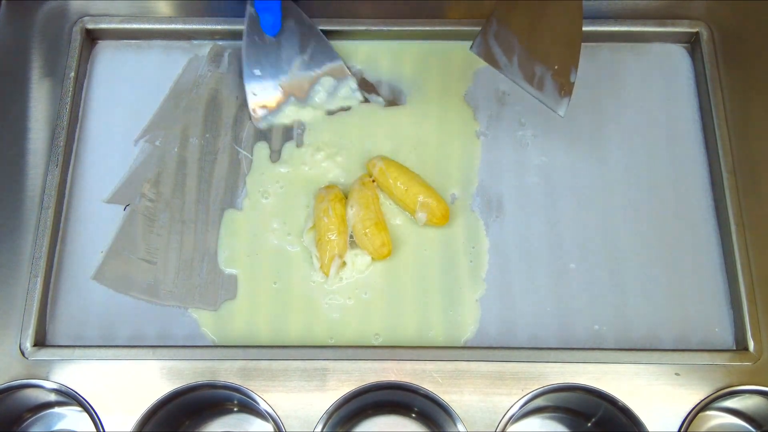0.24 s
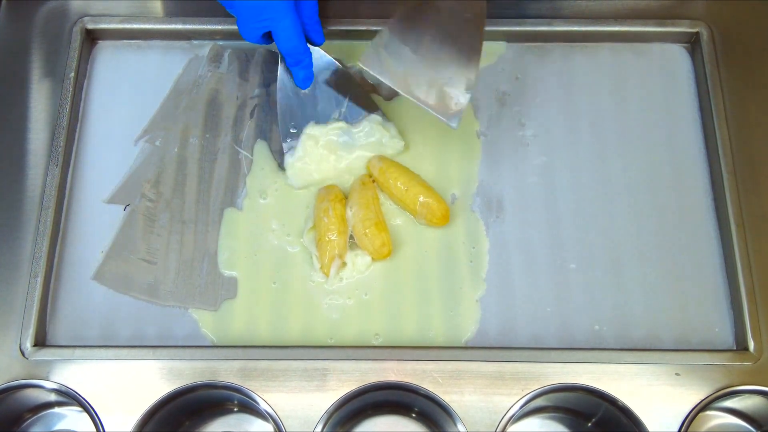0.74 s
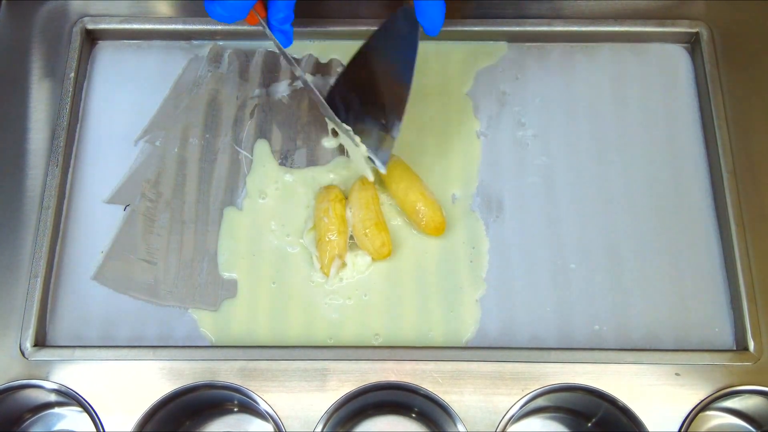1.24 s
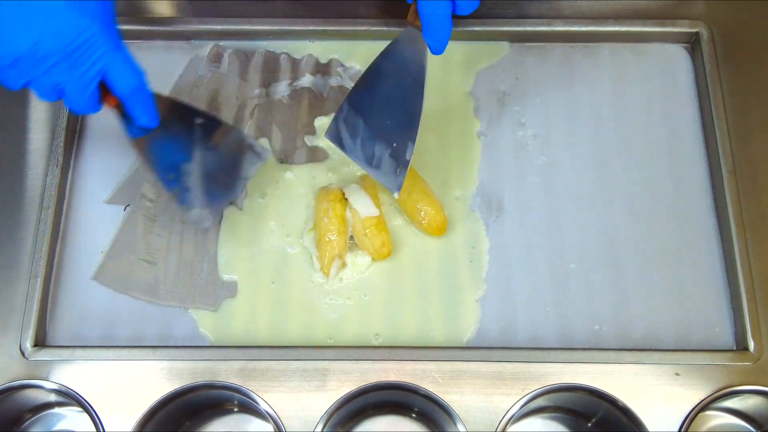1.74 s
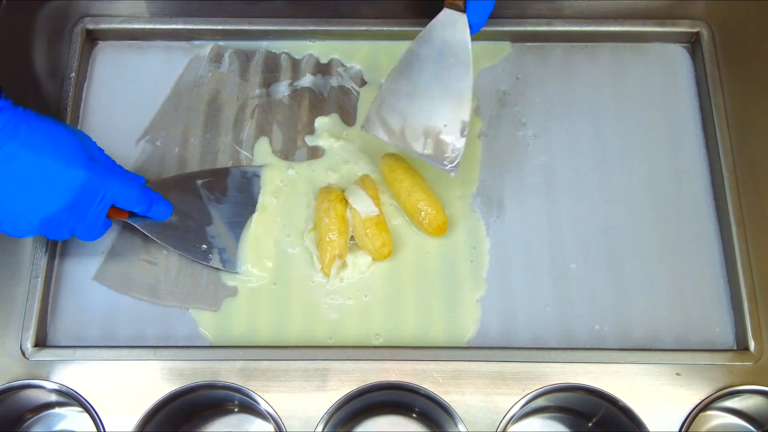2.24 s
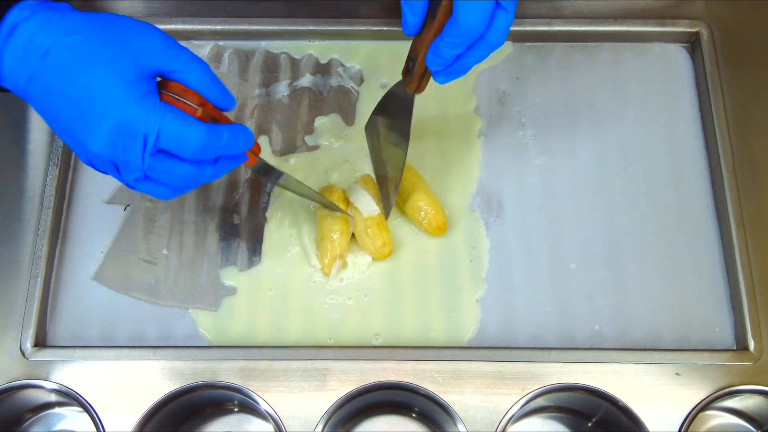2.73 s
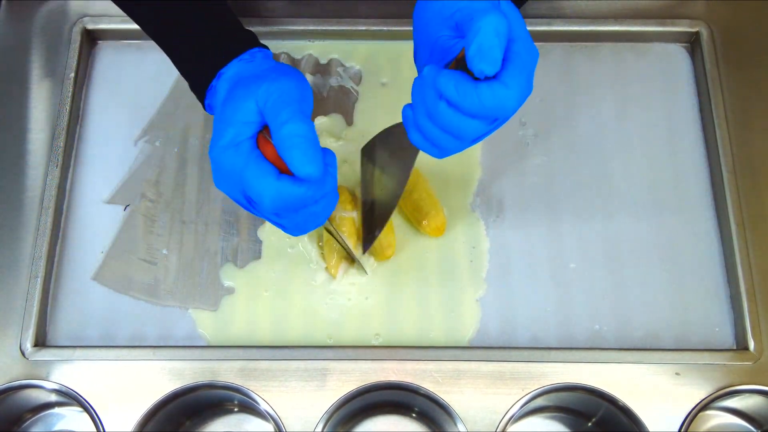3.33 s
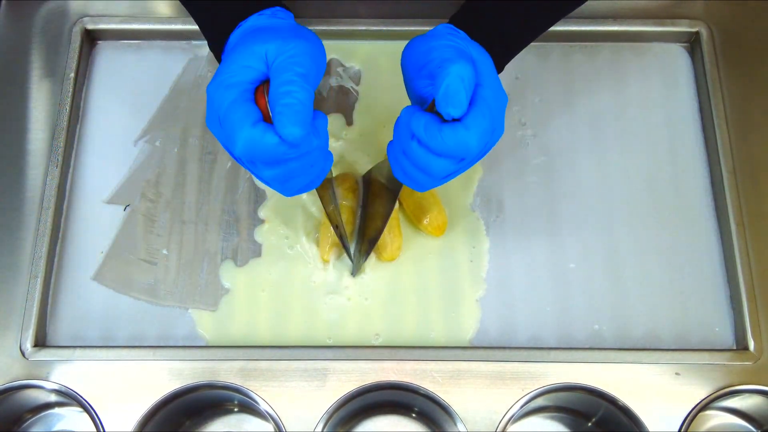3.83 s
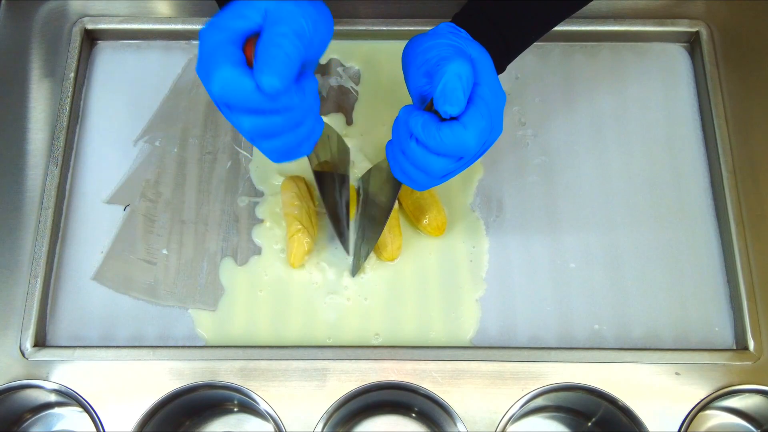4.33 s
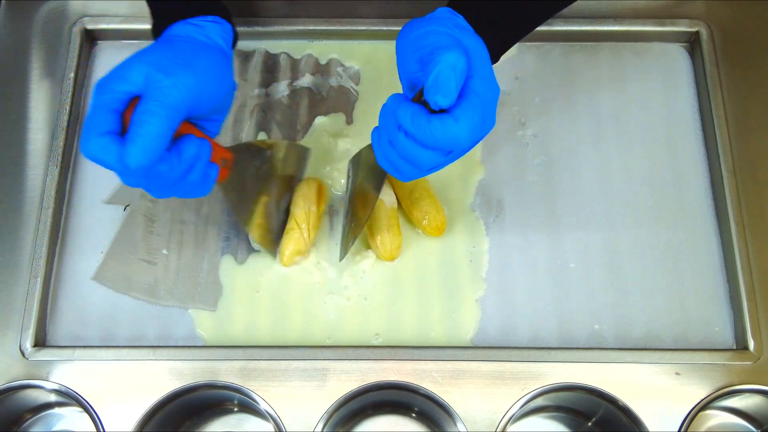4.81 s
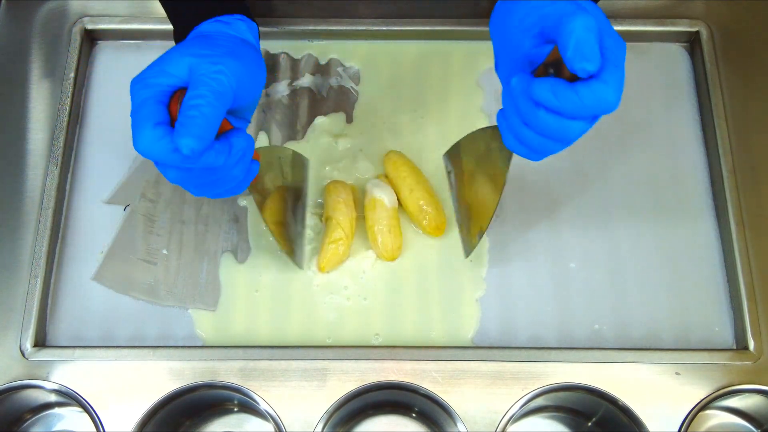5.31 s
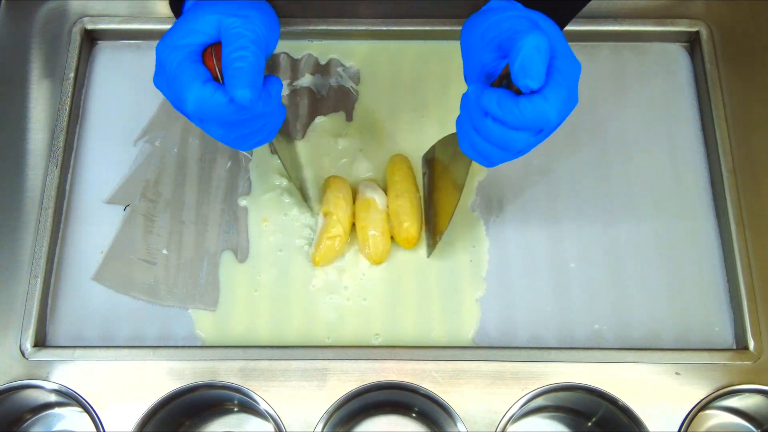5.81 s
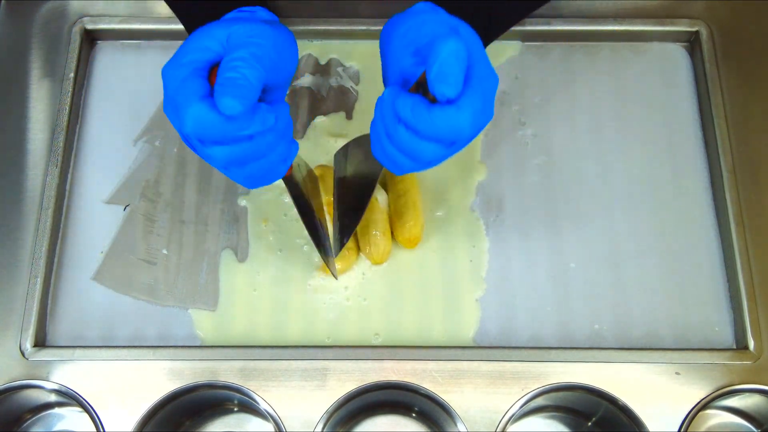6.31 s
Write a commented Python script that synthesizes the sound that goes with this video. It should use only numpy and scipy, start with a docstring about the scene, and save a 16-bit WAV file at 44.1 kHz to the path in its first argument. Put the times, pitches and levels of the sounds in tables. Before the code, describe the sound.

In a small hard room, close stereo microphones pick up two steel spatulas working on a frozen steel plate. A faint, low, slightly wavering compressor hum and soft air noise continue throughout. At about 0.16 s a quick double clack sounds, followed by a faint gritty slide. A dull tap comes at 0.6 s and thin, high ticks around 1.1 s. A sharp, loud clack at 1.5 s leads into a bright, fast-fading scrape; another tight double clack falls near 1.9 s with light sliding after it. A soft low bump at 2.9 s and small ticks and rasps from 3.4 to 3.7 s are much quieter. The loudest blows come at 4.27 and 4.51 s: hard chops with plate ring and counter thump. Softer clacks follow at 4.9 and 5.5 s, then a light tick and thin scrape at 6.24 s, and brisk clacks at 6.42 and 6.49 s.

```python
"""Steel spatulas on a frozen plate

Small hard room, heard by two microphones: two steel spatulas clack together and on a frozen steel plate.
Each blow is a tick at the edge, a short clack, ringing blade and plate modes and a thump in the counter.
Blade edges slide in between as filtered grit; the walls answer with sparse reflections.
Behind lies the freezer's compressor: wavering tones over shaped air noise."""
import sys
import numpy as np
from scipy import signal
from scipy.fft import rfft, irfft
from scipy.io import wavfile
from scipy.ndimage import uniform_filter1d

SR = 44100
rng = np.random.default_rng(int(sys.argv[2]) if len(sys.argv) > 2 else 0)


def pcm_store(signal):
    """Save signal as 16-bit PCM."""
    levels = np.round(np.clip(np.atleast_2d(signal), -1, 1) * 32767)
    wavfile.write(sys.argv[1], SR, levels.astype(np.int16).T)


N = 289296


def gain_of(db):
    """Amplitude factor of a level in dB."""
    return 10 ** (np.asarray(db) / 20)


def evened(x):
    """Scales to rms 1."""
    return x / np.sqrt(np.mean(x ** 2) + 1e-20)


def peaked(x):
    """Scales to peak 1."""
    return x / (abs(x).max() + 1e-12)


def burst(x):
    """Scales a short sound so that its energy equals 3 ms at level 1."""
    return x * np.sqrt(3 * SR // 1000) / (np.linalg.norm(x) + 1e-12)


def read(points, hz):
    """Reads a curve of (frequency, value) points along a logarithmic frequency axis."""
    f, value = np.transpose(points)
    return np.interp(np.log(hz + 1), np.log(f + 1), value)


def add(mix, start_s, sound):
    """Lays a sound into the mix in place, cut off at the end."""
    part = mix[..., round(start_s * SR):][..., :sound.shape[-1]]
    part += sound[..., :part.shape[-1]]


def band(x, lo_hz, hi_hz):
    """Band-pass."""
    return signal.sosfilt(signal.butter(N=3, Wn=(lo_hz, hi_hz), btype="band", fs=SR, output="sos"), x)


def resonate(x, hz, width_hz):
    """Shifts the frequency hz down to zero, smooths, and shifts back: a resonance of gain 1."""
    turn = np.exp(2j * np.pi * np.cumsum(hz * np.ones(len(x))) / SR)
    r = np.exp(-np.pi * width_hz / SR)
    smooth = signal.lfilter([1 - r], [1, -r], x / turn + 1e-18)
    return 2 * (turn * smooth).real


def ring(hz, db, t60, t):
    """Sum of dying modes struck at t = 0, scaled to peak 1."""
    hz, db, t60 = (np.asarray(v)[:, None] for v in (hz, db, t60))
    modes = gain_of(db - 60 * t / t60) * np.sin(2 * np.pi * hz * t)
    return peaked(modes.sum(0))


def wander(t, top_hz):
    """Slow random curve of rms 1: sines of random phase from 0.2 Hz to top_hz, weaker upwards."""
    rates_hz = np.geomspace(.2, top_hz, num=20)
    return evened(sum(np.sin(2 * np.pi * (f * t + rng.random())) / np.sqrt(f) for f in rates_hz))


def levelled(x):
    """Evens out broad humps of the spectrum, keeping the fine grain."""
    z = rfft(x)
    return irfft(z / np.sqrt(uniform_filter1d(abs(z) ** 2, size=40) + 1e-20), len(x))


# Balance of the freezer between the microphones: (frequency [Hz], left over right [dB])
FREEZER_LEAN = [(60, -1), (240, 0.5), (950, 3), (3770, -1.5), (15000, -1)]
# Spectrum of the air noise before overall scaling: (frequency [Hz], relative level per Hz [dB])
AIR_SPECTRUM = [(18, -29.5), (30, -12), (64, -2.5), (92, -16.5), (203, -13.5), (243, -13.5), (444, -14),
                (506, -17), (730, -18.5), (790, -25), (1270, -21.5), (2250, -31.5), (10000, -45.5),
                (14400, -43.5), (15600, -48)]
AIR_DB = -56  # rms of the whole air noise
# Likeness of the air noise at the two microphones: (frequency [Hz], likeness [-1 to 1])
AIR_LIKENESS = [(60, 0.51), (120, 1), (240, 0.59), (480, 1), (950, 0.19), (1890, 0.35), (3770, 0.53),
                (7520, 0.13), (15000, 0.14)]


def freezer_air():
    """Air noise of the freezer: random spectra shaped in frequency, with drifting patches."""
    frames, hz = N // 512 + 5, np.fft.rfftfreq(2048, 1 / SR)
    a, b, c, d, patches = rng.standard_normal((frames, 1025, 5)).T
    patches = uniform_filter1d(patches, size=20, axis=0)  # across frequency
    patches = evened(uniform_filter1d(patches, size=8, axis=1))  # across time
    same = np.clip(read(AIR_LIKENESS, hz), -1, 1)[:, None]
    left, own = a + 1j * b, c + 1j * d
    z = np.array([left, same * left + np.sqrt(1 - same ** 2) * own])
    lean_db = read(FREEZER_LEAN, hz)[:, None] / 2
    drift_db = 1.6 * patches + .6 * wander(np.arange(frames) * 512 / SR, 3)
    z *= gain_of(read(AIR_SPECTRUM, hz)[:, None] + drift_db + np.array([lean_db, -lean_db]))
    air = signal.istft(z, nperseg=2048, noverlap=1536)[1][:, :N]
    return gain_of(AIR_DB) * evened(air)


# Compressor tones before wavering and lean: (frequency [Hz], rms level [dB])
COMPRESSOR_TONES = [(48.4, -53.5), (96.9, -60.5), (140.0, -63), (199.2, -65), (436.0, -69.5), (1163, -79.5),
                    (1696, -76)]


def compressor_hum():
    """Steady compressor tones whose level and phase waver slowly, each on its own."""
    hum = np.zeros((2, N))
    t, slow_t = np.arange(N) / SR, np.arange(0, N / SR + .02, .01)
    for f, db in COMPRESSOR_TONES:
        level_db, drift = (np.interp(t, slow_t, wander(slow_t, 17)) for _ in range(2))
        phase = 2 * np.pi * f * t + (0.48 + f / 250) * drift + 7 * rng.random()
        tone = np.sqrt(2) * gain_of(db + 0.47 * level_db) * np.sin(phase)
        hum += tone * gain_of(np.array([[.5], [-.5]]) * read(FREEZER_LEAN, f))
    return hum


# Small hard room, decay before the extra late drop:
# (frequency [Hz], decay by 60 dB [s], level [dB], left-right likeness [0 to 1])
ROOM_DECAY = [(100, 0.64, -6.5, 0.46), (304, 0.61, -5, 0.98), (656, 0.65, 4, 0.3), (1614, 0.48, 1.5, 0.48),
              (5040, 0.51, -3.5, 0.63), (8000, 0.35, -4, 0.34), (13920, 0.23, -6.5, 0.4),
              (16000, 0.31, -4.5, 0.5)]
TAIL_DROP_S = .15  # beyond about this time the tail drops away faster


def room_tail():
    """Sparse reflections of random sign, each band dying at its own speed, partly shared left and right."""
    taps = np.zeros((2, SR // 2))
    slots = np.arange(200, SR // 2 - 20, 12)  # first reflections about 4.5 ms, or 1.5 m of path, late
    at = slots + rng.integers(0, 12, (2, len(slots)))
    np.put_along_axis(taps, at, rng.choice([-1., 1.], at.shape), 1)
    hz, t, (a, b) = signal.stft(taps / np.sqrt(SR / 200), SR, nperseg=256)
    room_hz, *columns = np.transpose(ROOM_DECAY)
    t60, db, same = (read(np.transpose([room_hz, c]), hz)[:, None] for c in columns)
    same = np.clip(same, 0, 1)
    z = np.array([a, same * a + np.sqrt(1 - same ** 2) * b])
    z *= gain_of(db - 60 * t / t60 - (t / TAIL_DROP_S) ** 4)
    return signal.istft(z, SR, nperseg=256)[1]


# Modes of a spatula blade, for slides and blows: (frequency [Hz], relative level [dB])
BLADE_MODES = [(904, 2.5), (1180, 2.5), (1750, 4.5), (2600, -0.5), (3050, 1.5), (3800, -5), (4450, -3.5),
               (5200, -15.5), (6060, 1.5), (7250, -1.5), (8200, -0.5), (9210, 0), (10600, 1), (11700, -2.5),
               (12900, -2), (14200, 4.5)]
SLIDE_IN_S, SLIDE_OUT_S = 0.0054, 0.09


def slide(length, hiss_db, hiss_hz, rasp_db, rasp_hz, fade_db):
    """Fine grit under the edge: a hiss with strong blade modes, and a lower rasp, fading as the blade slows."""
    t = np.arange(0, length, 1 / SR)
    stroke = np.clip(np.minimum(t / SLIDE_IN_S, (length - t) / SLIDE_OUT_S), 0, 1)
    stroke = stroke * gain_of(fade_db * t / length)
    grit = rng.standard_normal(len(t)) * gain_of(2.1 * rng.exponential(1, len(t)))  # uneven grains
    blade = sum(gain_of(db) * resonate(grit, f, 150) for f, db in BLADE_MODES)
    grit = evened(grit) + 1.6 * evened(blade)
    hiss = evened(band(grit, 7300, 13600)) + 0.81 * evened(resonate(grit, hiss_hz, 500))
    rasp = 1.4 * evened(band(grit, 1100, 3900)) + evened(resonate(grit, rasp_hz, 450))
    return (gain_of(hiss_db) * evened(hiss) + gain_of(rasp_db) * evened(rasp)) * stroke


# Slides of a blade edge, levels as rms before the stroke's envelope:
# (start [s], length [s], hiss level [dB], hiss pitch [Hz], rasp level [dB], rasp pitch [Hz],
#  level change over the slide [dB])
SLIDE_EVENTS = [(0.196, 0.22, -57, 12600, -76, 4300, -6.5), (1.545, 0.21, -41.5, 10340, -70, 2900, -26.5),
                (1.923, 0.16, -57.5, 7600, -76, 2610, -2), (2.178, 0.12, -74, 7560, -73, 800, -2),
                (3.422, 0.084, -59, 12800, -81, 994, -6), (3.504, 0.11, -80, 8000, -53.5, 3150, -10),
                (3.654, 0.067, -62, 13500, -64, 4400, -14), (6.246, 0.27, -53, 9100, -81, 3670, -23)]
SLIDE_WALLS_DB = 5  # gain of the room's answer to a slide


def slides():
    """Every slide, direct in the middle and through its own draw of the room."""
    out = np.zeros((2, N))
    for start, *stroke in SLIDE_EVENTS:
        grit = slide(*stroke)[None]
        add(out, start, grit)
        add(out, start, gain_of(SLIDE_WALLS_DB) * signal.fftconvolve(grit, room_tail(), axes=1))
    return out


# Modes of the counter: (frequency [Hz], width [Hz], relative level [dB]); a mode dies by 60 dB in 2.8 / width
COUNTER_MODES = [(45, 25, -6.5), (100, 120, -5), (179, 68, 2)]


def counter_thump(t):
    """Low modes of the counter under the plate, struck at once."""
    hz, width, db = np.transpose(COUNTER_MODES)
    return ring(hz, db, 2.8 / np.abs(width), t)


# Modes of the plate before each spot's scatter: (frequency [Hz], relative level [dB])
PLATE_MODES = [(402, 8.5), (445, 1), (520, -3), (640, 7), (840, -2.5), (962, 1.5)]


def plate_ring(clatter, t):
    """Plate modes, shifted a little by the spot struck, over the low part of the blade's clatter."""
    hz, db = np.transpose(PLATE_MODES)
    spot = rng.standard_normal((2, len(hz)))
    modes = ring(hz * (1 + 0.004 * spot[0]), db + 0.38 * spot[1], np.full(len(hz), .08), t)
    return modes * (1 - np.exp(-t / 0.0013)) + 0.75 * peaked(band(clatter, 320, 1237))


BLADE_WIDTH_HZ = 110  # width of a struck blade mode


def blade_clatter(knock, rise, shiver_ms, modes_db, t):
    """Countless overlapping modes as dying noise, plus the blade's own modes at levels new to each spot."""
    shiver = rng.standard_normal(len(t)) * (1 - np.exp(-t / rise))
    shiver = shiver * np.exp(-t * 1000 / max(shiver_ms, 2))
    modes = 0
    for f, db in BLADE_MODES:
        spot_db = db + 2.5 * rng.standard_normal()
        modes = modes + gain_of(spot_db) * burst(resonate(knock, f, BLADE_WIDTH_HZ))
    clatter = burst(levelled(burst(knock) + 3.3 * burst(shiver))) + gain_of(modes_db) * burst(modes)
    return clatter * np.clip(20 * (t[-1] - t) - 1, 0, 1)  # faded out from 0.10 to 0.15 s


# Bands of the rattle: (lower edge [Hz], upper edge [Hz])
RATTLE_BANDS = [(800, 2300), (2300, 5000), (5000, 9500), (9500, 17000)]
# Colour of the rattle, one per band before each blow's brightness: (level [dB])
RATTLE_COLOUR = [1, 2.5, 4.5, 1]


def blade_rattle(clatter, rattle_db, bright_db, hump_db):
    """The clatter rebalanced in four bands, tilted by the brightness, with a hump in the second band."""
    number = np.arange(4)
    band_db = rattle_db + np.array(RATTLE_COLOUR) + bright_db * (number - 3 / 2) + hump_db * (number == 1)
    return sum(gain_of(db) * burst(band(clatter, *edges)) for db, edges in zip(band_db, RATTLE_BANDS))


def edge_knock(rise, t):
    """The edge lands bit by bit: sparse random touches around one firm tick."""
    touches = rng.standard_normal(len(t)) * (rng.random(len(t)) < .15)
    touches = touches * t / rise * np.exp(-t / rise)
    tick = np.arange(len(t)) == round(rise * SR)
    return tick * np.linalg.norm(touches) / 2 + touches


def steel_clack(knock, clack_hz, ring_ms):
    """One short resonance excited by the knock, band-passed about an octave either side of its pitch."""
    width_hz = np.log(1000) / np.pi * 1000 / max(ring_ms, 2)  # dies by 60 dB in ring_ms
    return peaked(band(resonate(knock, clack_hz, width_hz), clack_hz / 2, min(2 * clack_hz, 16000)))


RISE_MS, RISE_MS_PER_DB = 1.6, 0.38  # rise time of a blow at brightness 0, and its change per dB of brightness


def blow(clack_db, clack_hz, ring_ms, rattle_db, bright_db, shiver_ms, modes_db, plate_db, thump_db, hump_db):
    """One steel contact; hands and cream damp the steel fast, and each spot excites other modes."""
    t = np.arange(SR // 5) / SR
    rise = max(RISE_MS + RISE_MS_PER_DB * bright_db, .2) / 1000
    knock = edge_knock(rise, t)
    clack = gain_of(clack_db) * steel_clack(knock, clack_hz, ring_ms)
    clatter = blade_clatter(knock, rise, shiver_ms, modes_db, t)
    rattle = blade_rattle(clatter, rattle_db, bright_db, hump_db)
    plate = gain_of(plate_db) * plate_ring(clatter, t)
    thump = gain_of(thump_db) * counter_thump(t)
    return rise, clack, rattle + plate + thump


SIDES, SWAP_S = 3, .09  # the walls hear the steel from several sides, taking turns


def walls(strike):
    """The room's answer to a blow; each side of the steel radiates its own mix of modes."""
    out = 0
    for k in range(SIDES):
        _, clack, body = blow(*strike)
        tail = room_tail()
        t = np.arange(tail.shape[1]) / SR
        turn = np.sqrt(2 / SIDES) * np.cos(np.pi * (t / SWAP_S + k / SIDES))
        side = clack / 2 + body  # the clack beams upwards, so the walls get less of it
        out = out + signal.fftconvolve(side[None], tail * turn, axes=1)
    return out


# Blows, levels of the direct sound before its left-right balance:
# (time of the knock [s], clack level [dB], clack pitch [Hz], clack ring [ms], rattle level [dB],
#  rattle brightness [dB per band], shiver decay to 1/e [ms], blade modes over clatter [dB],
#  plate level [dB], counter thump level [dB], extra rattle in the second band [dB], left over right [dB])
BLOW_EVENTS = [(0.158, -29.5, 2840, 18, -36, 0.5, 15, 1, -51, -48, 0, 3.5),
               (0.1722, -30.5, 1660, 30, -39, 0, 18, -5, -39, -44, 6, 1),
               (0.600, -54, 1300, 10, -72.5, -5, 17, 7, -47.5, -46, 2, .5),
               (1.0522, -47.5, 6100, 65, -55.5, 8.5, 6.5, 8, -52, -60, 1.5, -8),
               (1.131, -49.5, 3950, 17, -59.5, 8.5, 3.9, -2, -68, -61, 6, -1),
               (1.5257, -17, 1658, 33, -22.5, 4.5, 4.9, -13, -46.5, -49.5, 5, 1),
               (1.8757, -21, 4510, 4, -34.5, 2.5, 14, -2.5, -37, -43, 5.5, 1),
               (1.9, -22.5, 2500, 7.3, -50, 2.5, 6.2, 9, -49, -62, -15.5, -4),
               (2.940, -75, 996, 6.7, -78, -4, 17, -2.5, -60.5, -38, -2, -1),
               (3.4156, -56, 9130, 15, -62, 7.5, 7.8, 0, -77, -59, 2, -2),
               (3.461, -52, 12900, 25, -63, 7, 12, 2, -78, -61, 2, 0),
               (3.5208, -40.5, 3130, 14, -58.5, -8, 8.2, -3, -39.5, -37, 3, -6),
               (3.647, -53.5, 9130, 26, -69, 6.5, 10, -2, -62, -53, -13, .5),
               (4.2519, -37.5, 4180, 7, -34, 1, 12, -5.5, -28, -36.5, 3, -0.5),
               (4.2747, -8.5, 2880, 20, -25, -3, 8.7, -12, -11, -23.5, 5, -0.5),
               (4.5132, -7.5, 3035, 15, -23, -6, 19.5, -5.5, -6.5, -19.5, 2, -0.5),
               (4.8733, -28, 1200, 30, -43, -2, 10.5, 2.5, -32.5, -39.5, 7.5, 5.5),
               (5.502, -27, 1437, 9.1, -42.5, -4, 18, 19, -60, -52.5, 9, -2.5),
               (5.52, -30, 3020, 13, -48.5, -3, 15.4, -7, -32.5, -35.5, -18, -4),
               (6.2357, -40, 4480, 11, -47.5, 7.5, 20, -8, -65, -54, 3, -2),
               (6.4237, -33.5, 10750, 12, -41.5, 8, 2.5, 8.5, -59, -49.5, 2, -1),
               (6.4919, -24, 2030, 19, -32.5, 1, 3.3, 1, -38, -41.5, 2.5, 1.5)]
LAG_S = 12e-6  # the left microphone hears the steel later, about 4 mm of path
WALLS_DB = 6  # gain of the room's answer to a blow


def blows():
    """Every blow, direct and through the room; each microphone hears its own side of the steel."""
    out = np.zeros((2, N))
    for knock_s, *strike, pan_db in BLOW_EVENTS:
        rise, clack, body = blow(*strike)
        left = clack + body
        right = clack + blow(*strike)[2]  # same clack, other modes
        start = knock_s - rise
        late = np.exp(-2j * np.pi * np.fft.rfftfreq(len(left), 1 / SR) * LAG_S)
        direct = np.array([irfft(rfft(left) * late, len(left)), right])
        add(out, start, direct * gain_of([[pan_db / 2], [-pan_db / 2]]))
        add(out, start, gain_of(WALLS_DB) * walls(strike))
    return out


def scene():
    """The freezer behind, the slides, and the blows in front."""
    return freezer_air() + compressor_hum() + slides() + blows()


def record(dry):
    """Both microphone channels low-passed at 16 kHz, without delay."""
    low_pass = signal.firwin(511, 16000, window=("kaiser", 9), fs=SR)
    return signal.oaconvolve(dry, low_pass[None], "same")


dry = scene()
out = record(dry)
pcm_store(out)
```